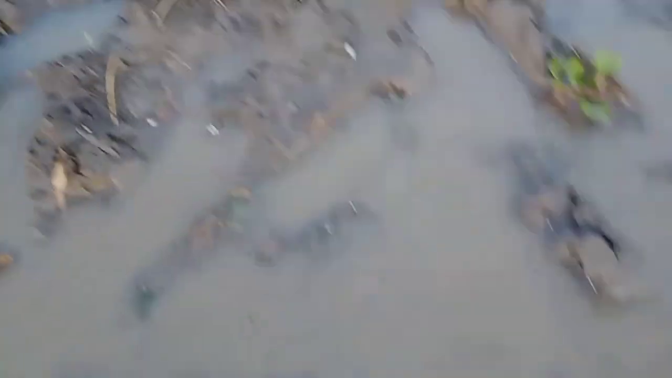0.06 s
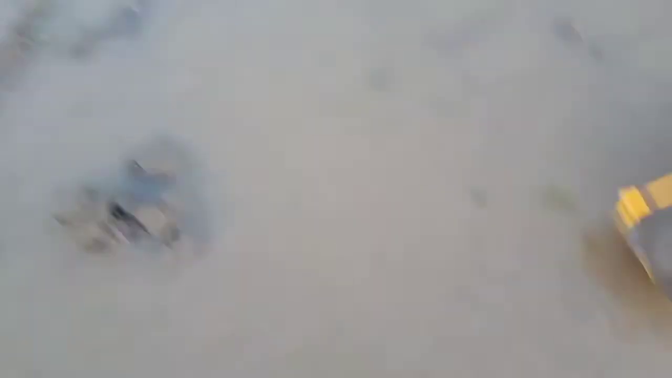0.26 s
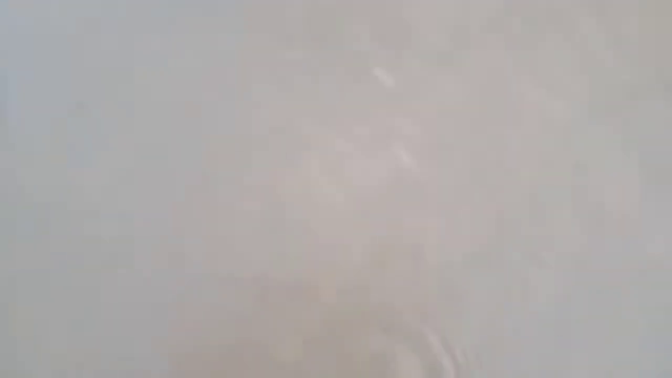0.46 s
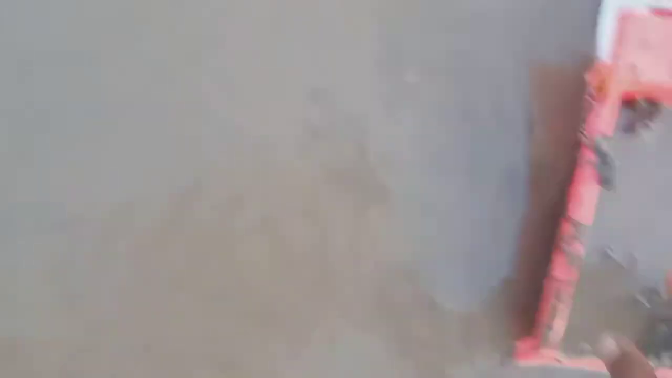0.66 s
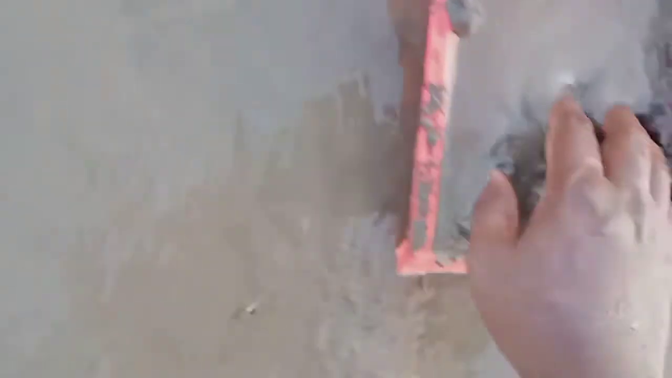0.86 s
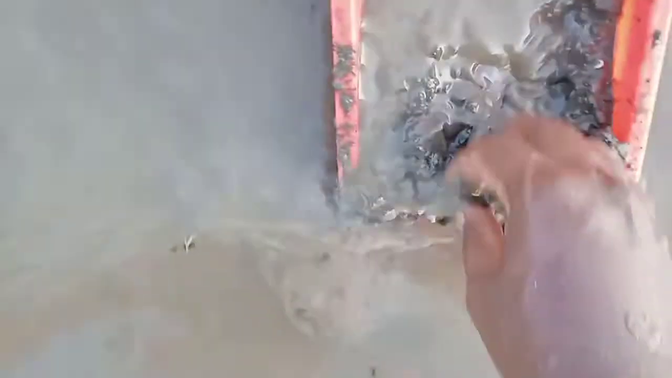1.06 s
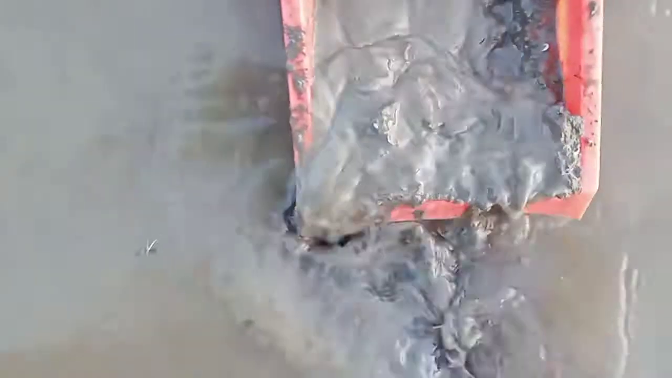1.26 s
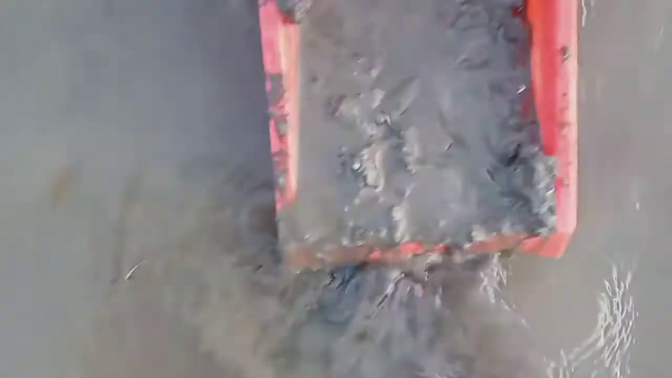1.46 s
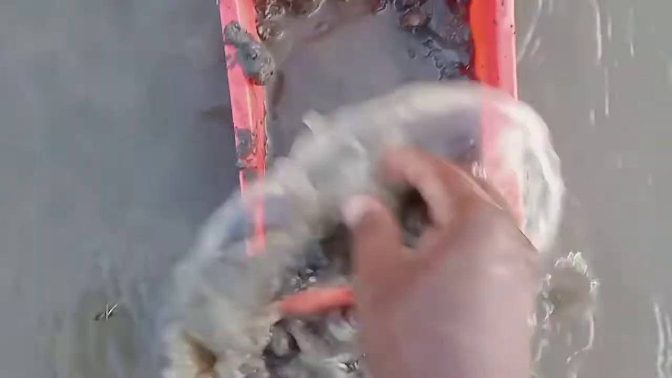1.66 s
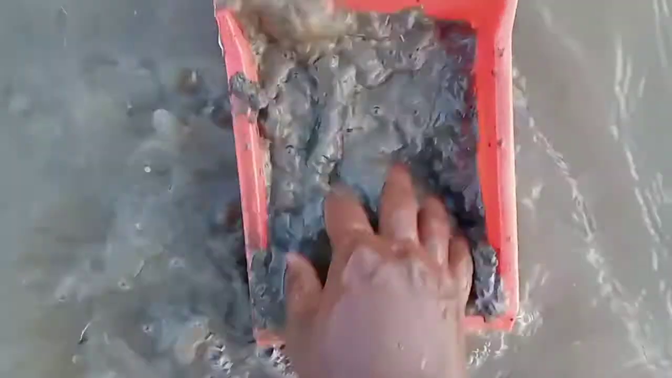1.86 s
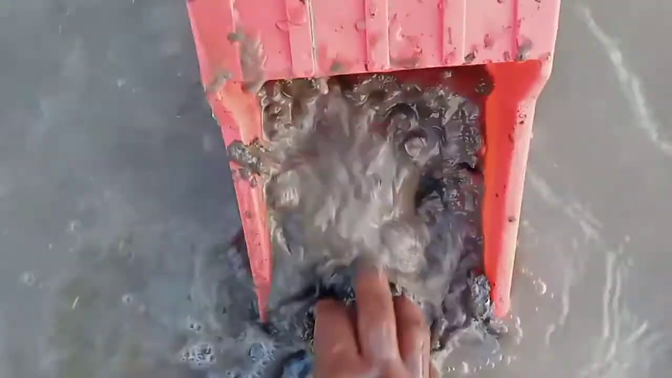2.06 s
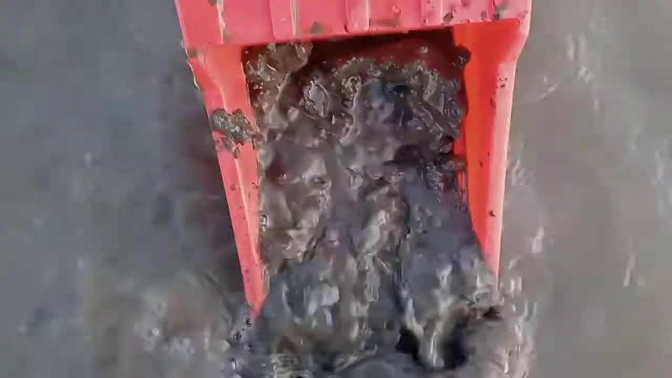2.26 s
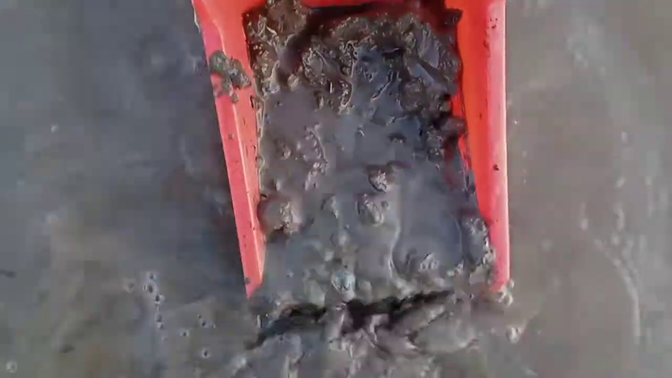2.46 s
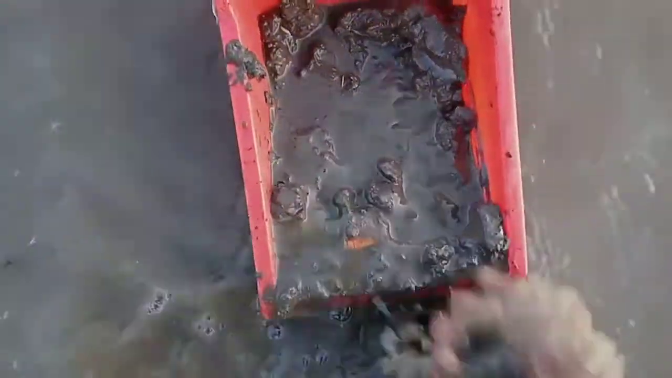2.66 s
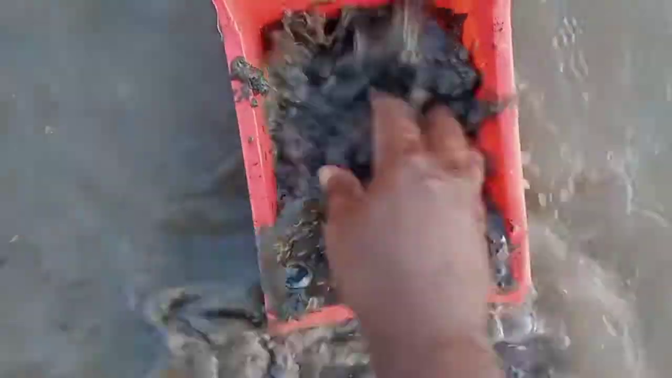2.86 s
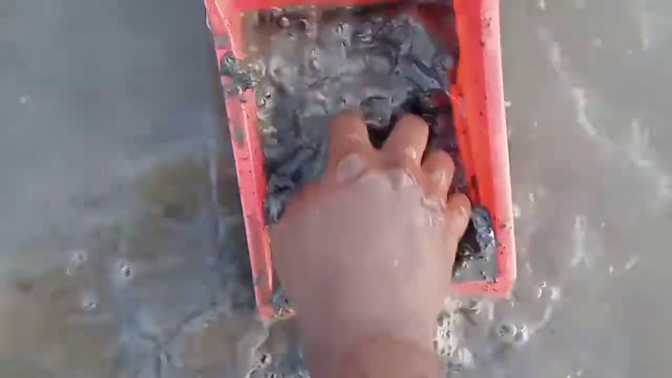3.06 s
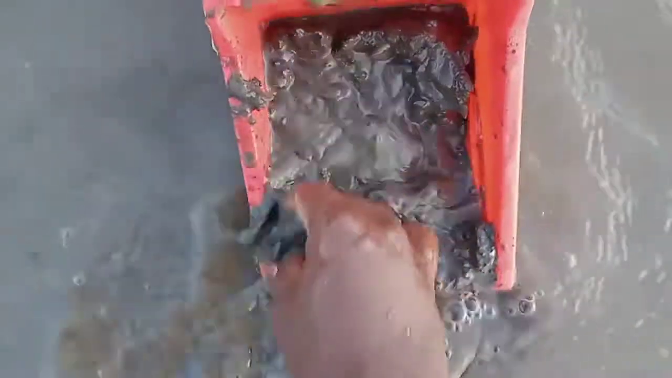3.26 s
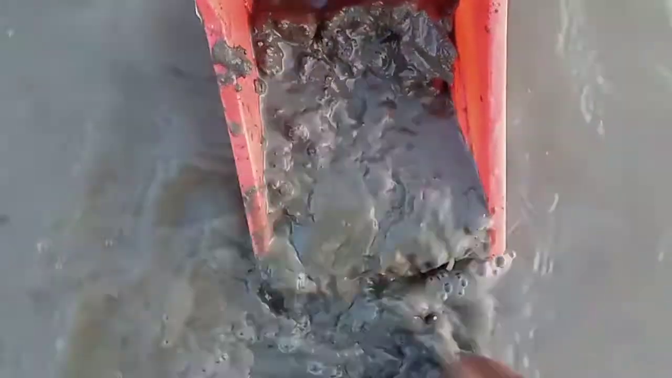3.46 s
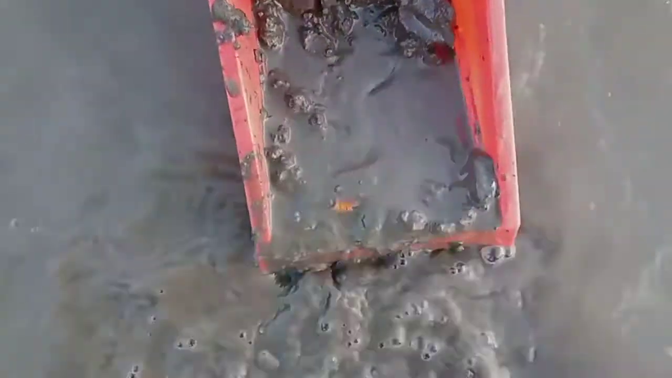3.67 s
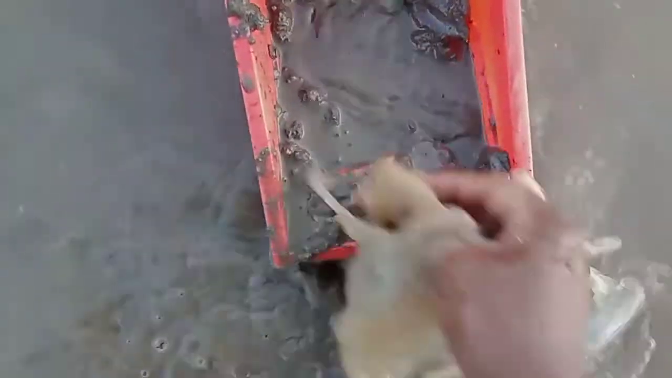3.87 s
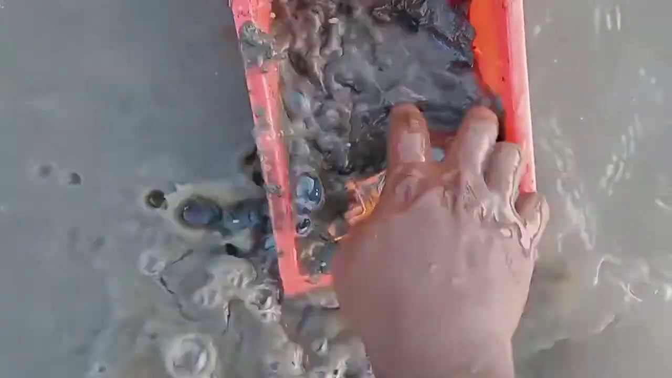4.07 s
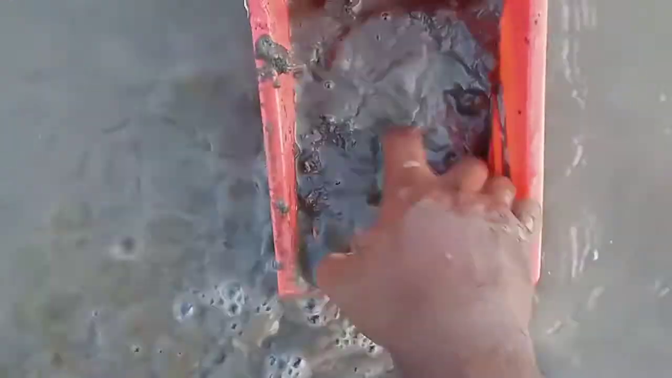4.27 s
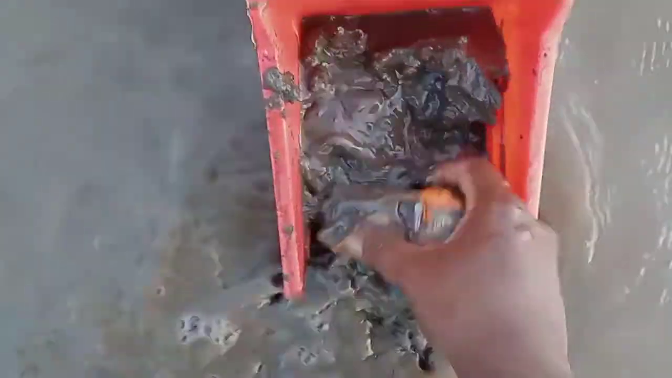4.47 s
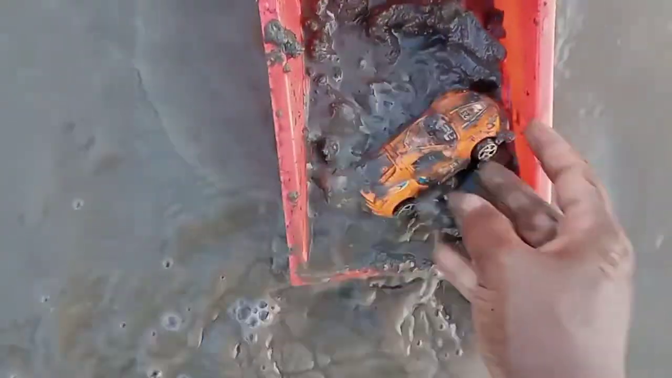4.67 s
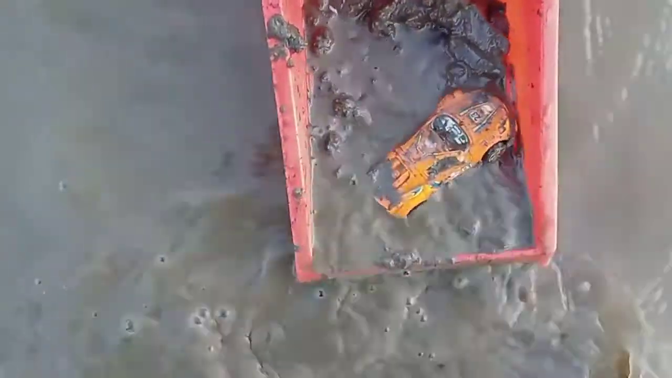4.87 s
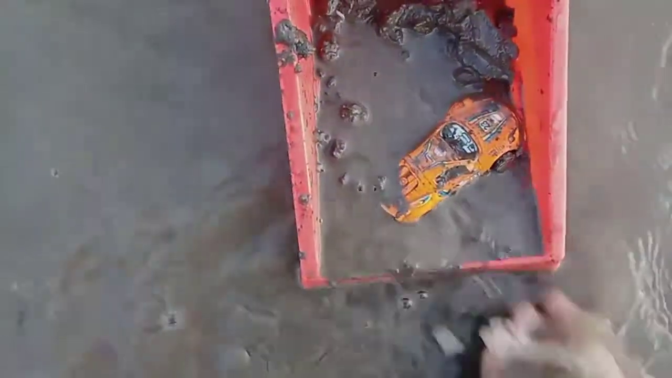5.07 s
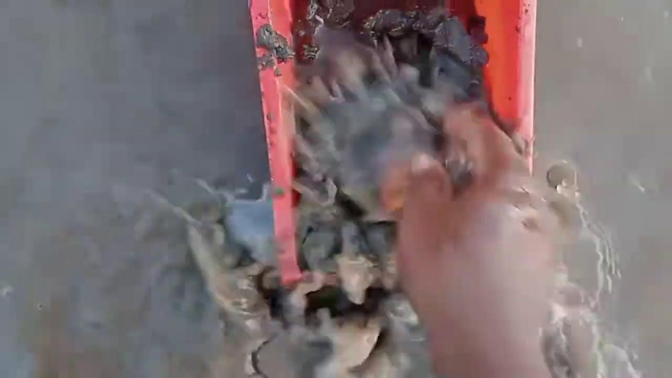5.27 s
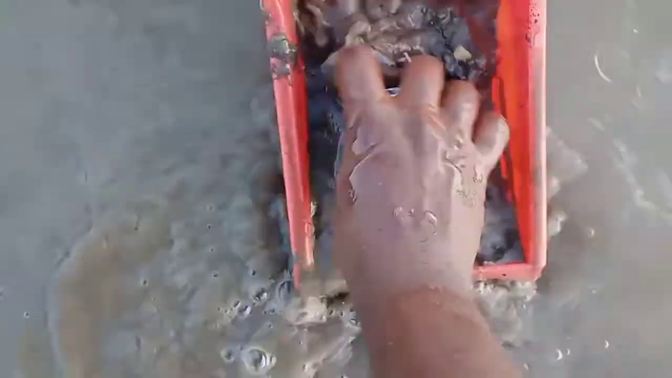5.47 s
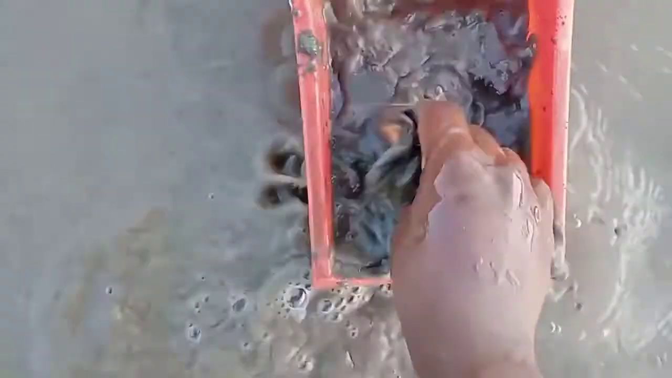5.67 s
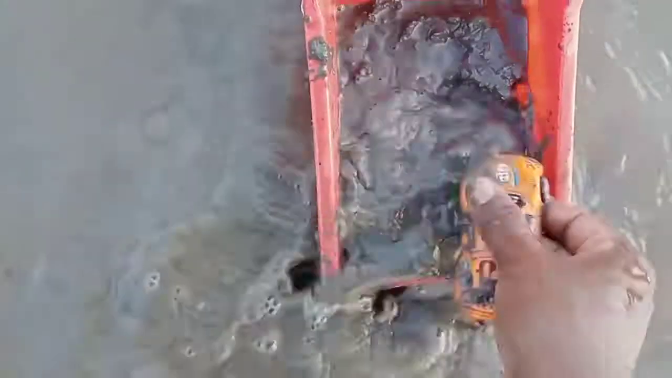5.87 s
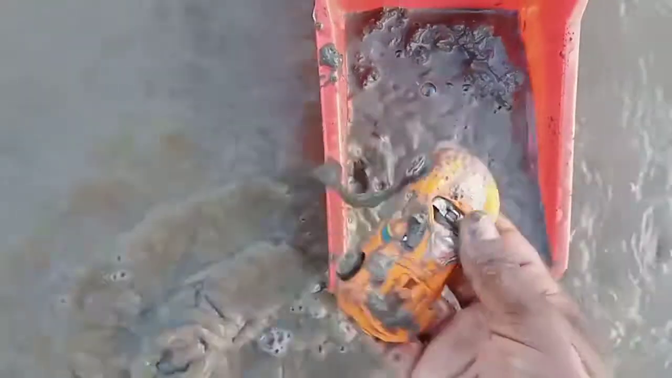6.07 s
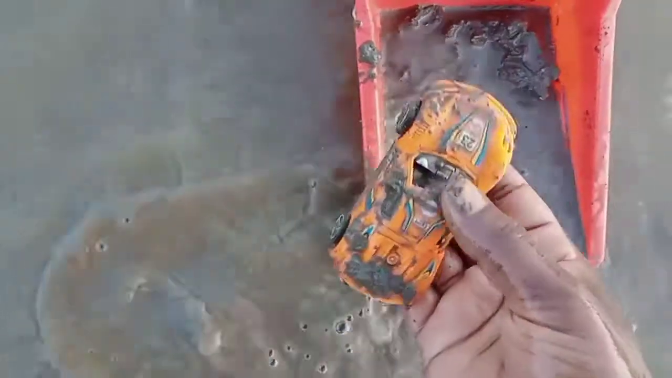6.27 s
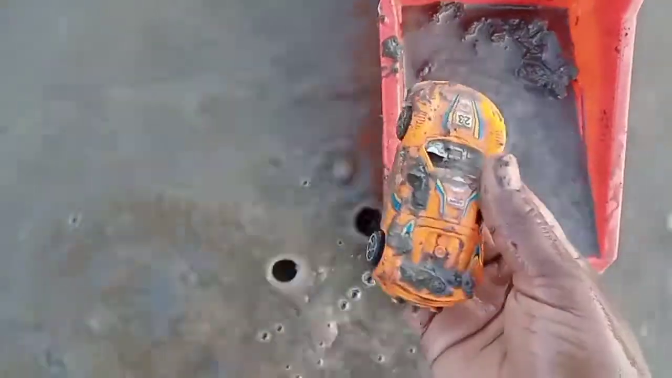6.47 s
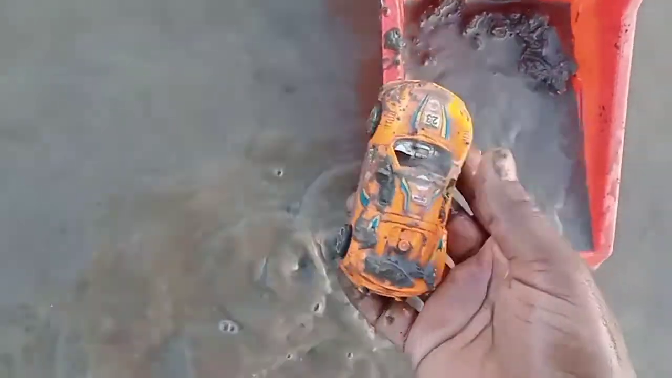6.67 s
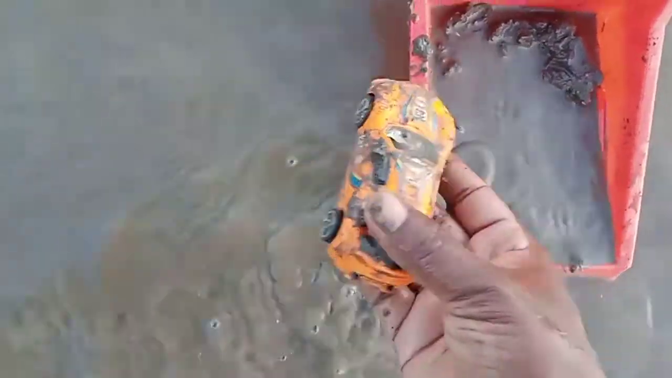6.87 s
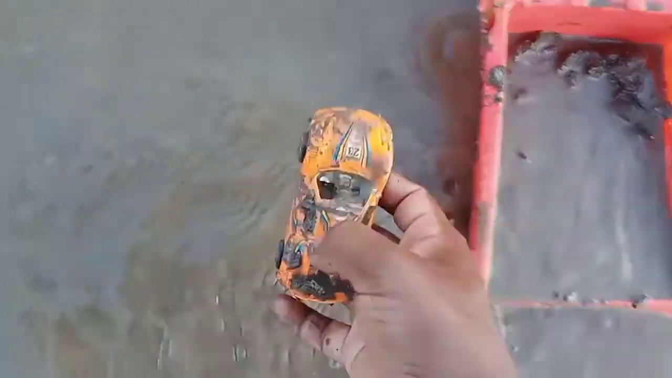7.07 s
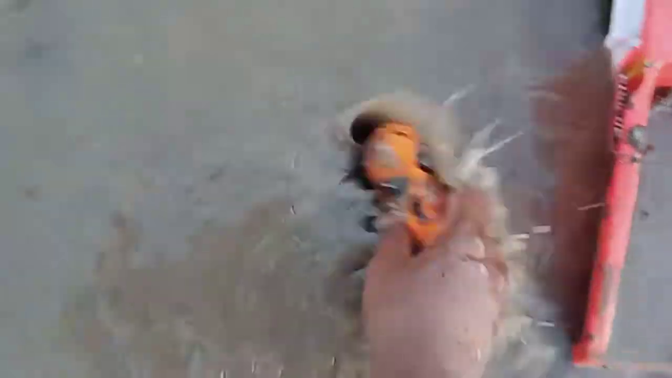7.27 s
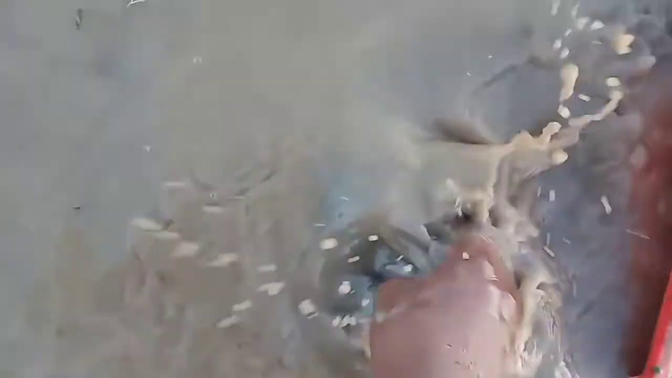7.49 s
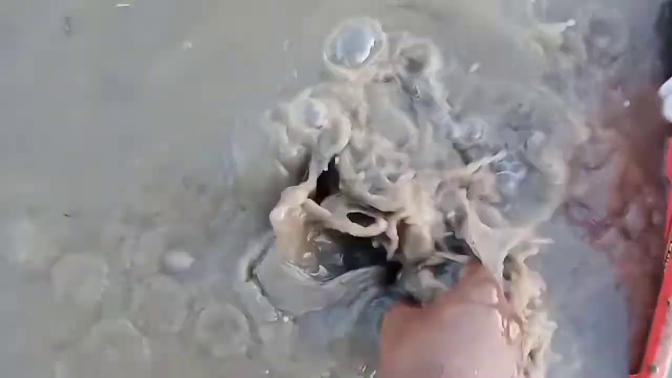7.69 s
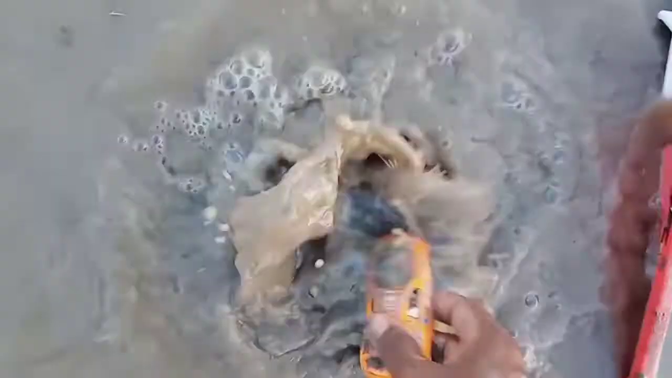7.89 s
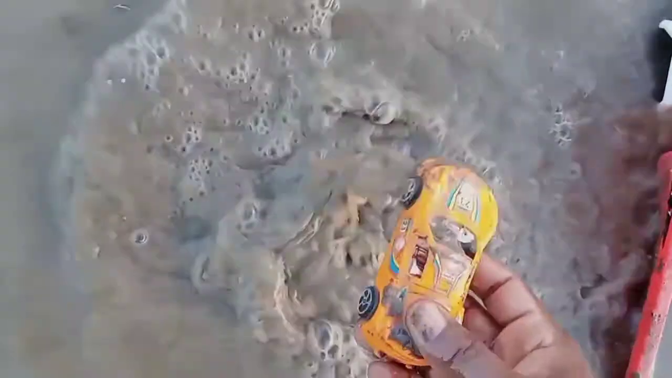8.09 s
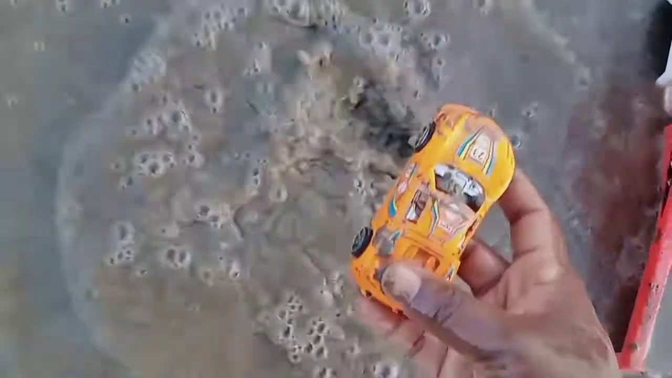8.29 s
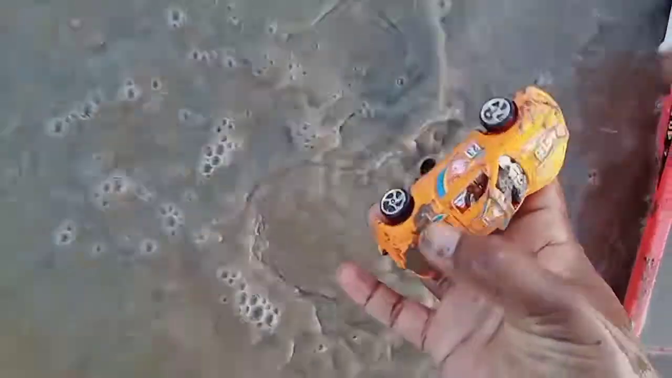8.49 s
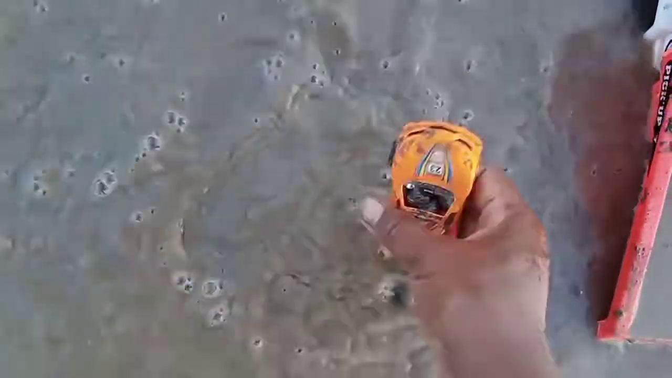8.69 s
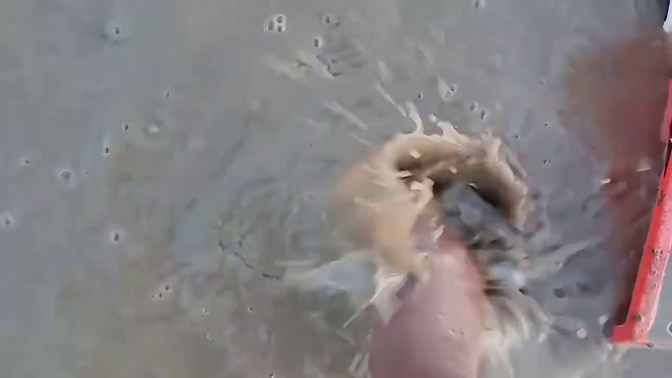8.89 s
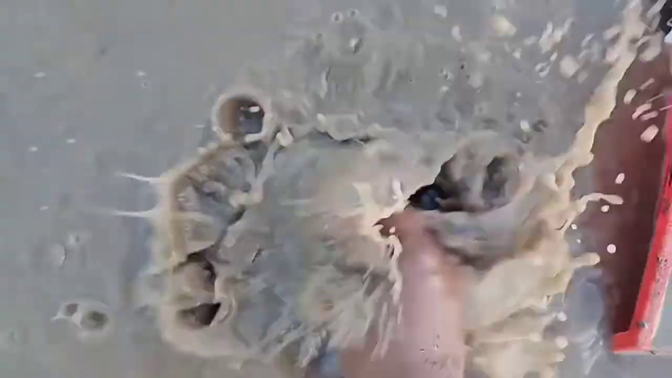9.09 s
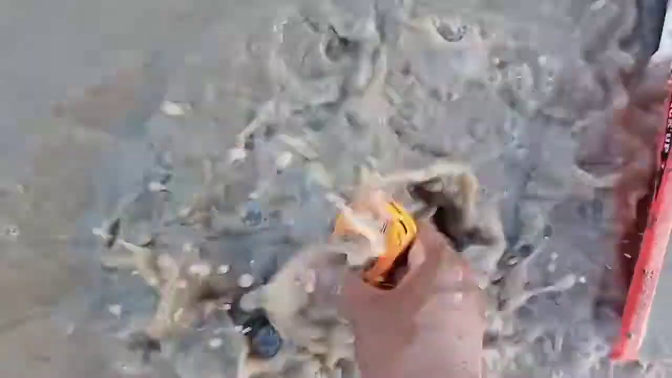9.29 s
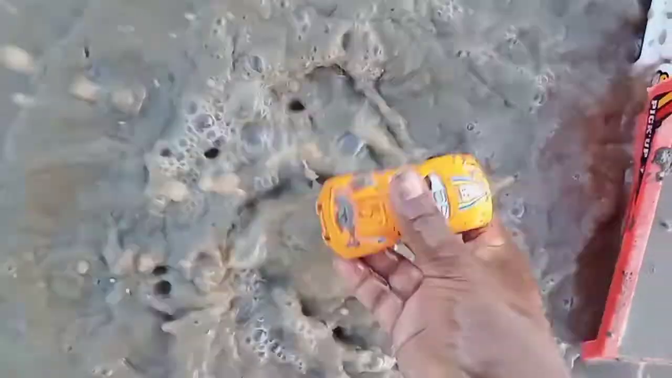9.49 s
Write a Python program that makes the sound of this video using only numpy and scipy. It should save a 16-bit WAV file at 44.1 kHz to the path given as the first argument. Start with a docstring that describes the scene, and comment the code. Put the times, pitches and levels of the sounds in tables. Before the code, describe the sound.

Outdoors, very close to a phone microphone, low wind buffets and a few finger taps come first over little water noise. Then a hand scoops muddy water in a plastic toy bed: short splashes, bubbly plops, wet smacks and spray in uneven strokes. After a near-quiet pause with faint drips and high insects, a toy car is dunked and shaken in two harder, gurgling bursts.

```python
"""A hand scoops muddy water into a plastic toy truck, then dunks and shakes a toy car, in a puddle close to a phone.
Trapped air rings as climbing sines, singly or in clouds; thrown water lands as bursts of bubbles and droplets.
Wet mud smacks as short noise bursts with a ping, and spray crackles as random filtered impacts.
At the microphone, shaped noise makes buffeting air and ringing knocks make finger taps.
Far behind, narrow noise in quick pulses makes high insects, over a faint bed of outdoor air."""
import sys
import numpy as np
from scipy import signal
from scipy.fft import rfft, irfft
from scipy.io import wavfile
from scipy.ndimage import uniform_filter1d

SR = 44100
rng = np.random.default_rng(int(sys.argv[2]) if len(sys.argv) > 2 else 0)


def wrap_up_sound(samples):
    """Save the sound to the file named by the first command line argument, as 16-bit audio."""
    columns = np.atleast_2d(samples).T
    # keep every value between -1 and 1, then stretch to whole-number steps
    tamed = np.clip(columns, -1, 1)
    steps = np.round(tamed * 32767).astype(np.int16)
    wavfile.write(sys.argv[1], SR, steps)


N = 420713  # samples

# Levels in the event tables are relative: the layers and the microphone add their own gains.


def undb(db):
    """Decibels to amplitude gain."""
    return 10 ** (np.asarray(db) / 20)


def unit(x):
    """Scale to rms 1."""
    return x / np.sqrt(np.mean(x ** 2) + 1e-20)


def curve(table):
    """A (t/s, value) table read at every sample."""
    return np.interp(np.arange(N) / SR, *np.transpose(table))


def add(out, start_s, x):
    """Mix x into out from the time start_s."""
    i = int(np.clip(start_s * SR, 0, N - 1))
    out[i:i + len(x)] += x[:N - i]


def walk(rate):
    """Smooth random wander through `rate` knots per second, spread near 1."""
    knots = rng.standard_normal(4096)
    return np.interp(np.arange(N) / SR * rate, np.arange(len(knots)), knots)


def colour(x, points, size=4096):
    """Minimum-phase filter with the given (f/Hz, level/dB) response."""
    hz, db = np.transpose(points)
    bins_hz = np.arange(size // 2 + 1) * SR / size
    log_gain = np.log(undb(np.interp(np.log(bins_hz + 1), np.log(hz), db)))
    # folding the cepstrum forward in time makes the filter causal
    cepstrum = irfft(log_gain)
    cepstrum[1:size // 2] *= 2
    cepstrum[size // 2 + 1:] = 0
    impulse = irfft(np.exp(rfft(cepstrum)))
    return signal.oaconvolve(x, impulse)[:len(x)]


def band(x, hz, width):
    """Two-pole resonance, gain 1 at the centre; hz and width in Hz."""
    w = 2 * np.pi * min(hz, SR / 2 - 1) / SR
    a = np.tan(np.pi * min(abs(width) / SR, .4))
    return signal.lfilter([a, 0, -a], [1 + a, -2 * np.cos(w), 1 - a], x)


def narrow(hz, width):
    """Noise in a band `width` Hz wide whose centre follows the curve hz; rms 1."""
    noise = rng.standard_normal(len(hz)) + 1j * rng.standard_normal(len(hz))
    slow = signal.sosfilt(signal.butter(2, width / 2, fs=SR, output="sos"), noise)
    carrier = np.exp(2j * np.pi * np.cumsum(hz) / SR)
    return unit((slow * carrier).real)


def ring(hz, t60, rise, onset=1.0):
    """A dying sine, as of a bubble: swells over about `onset` cycles and climbs by the share `rise`."""
    t = np.arange(int(abs(t60) * SR) + 2) / SR
    life = t / t[-1]
    tone = np.sin(2 * np.pi * hz * t * (1 + rise * life / 2))
    decay = np.exp(-np.log(1000) * life)  # 60 dB over the ring's life
    return tone * decay * (1 - np.exp(-t * hz / onset))


def droplets(rate, spread_db):
    """Random impacts, `rate` per second, their strengths spread exponentially in dB; rms 1."""
    hit = rng.random(N) < rate / SR
    size = undb(spread_db * np.minimum(rng.standard_exponential(N), 3.5))
    return unit(hit * size * rng.choice([-1, 1], N))


def froth(low_hz, high_hz, cycles, rise, spread_db, count):
    """A steady cloud of bubbles of mixed sizes, favouring the faint; rms 1."""
    out = np.zeros(N)
    for k, (when, pitch, size, damping, climb) in enumerate(rng.random((count, 5))):
        hz = low_hz * (high_hz / low_hz) ** pitch
        t60 = cycles * (.5 + damping) / hz
        # small bubbles die sooner but start as much stronger
        peak = undb(spread_db * size ** 2) * np.sqrt(hz)
        start_s = (k + 3 * when) / count * N / SR
        add(out, start_s, peak * ring(hz, t60, 2 * rise * climb, onset=.9))
    return unit(out)


def surges(rows, rise_s, fall_db_per_s):
    """Joint gain of (t/s, length/s, level/dB) events that each swell, hold and die away."""
    t = np.arange(0, N, 64) / SR
    power = np.zeros(len(t))
    for s, length, db in rows:
        swell = np.clip((t - s) / rise_s, 0, 1)
        fall_db = fall_db_per_s * np.maximum(t - s - length, 0)
        power += (undb(db - fall_db) * swell) ** 2
    return np.interp(np.arange(N) / SR, t, np.sqrt(power))


# spectrum of the open air around the puddle: f/Hz, level/dB
OUTDOOR_SPECTRUM = [(30, 4), (80, 10.5), (200, -4.5), (500, -6.5), (1000, -29), (1240, -15), (1500, -20.5),
                    (3000, -17.5), (5000, -16.5), (9000, -25), (16000, -21)]


def outdoor_air():
    """A faint, steady bed of shaped noise."""
    return undb(-70.0) * unit(colour(rng.standard_normal(N), OUTDOOR_SPECTRUM))


# calls of a nearer, lower insect: t/s, length/s, level/dB
NEARER_CHIRPS = [(6.188, 0.046, -60), (6.524, 0.072, -69), (6.9, .07, -71.5)]


def insects():
    """A far, high chirr in quick, slightly uneven wing strokes; a lower voice joins briefly."""
    strokes_per_s = 42 * (1 + 0.16 * walk(16))
    phase = np.cumsum(strokes_per_s) / SR % 1
    # each stroke swells and dies while its pitch falls
    stroke, fall = np.sin(np.pi * phase), .5 - phase
    pulsed = undb(-64) * stroke * narrow(7750 + 600 * fall, 450)
    steady = undb(-71.0) * narrow(np.full(N, 7700), 1120)
    out = (pulsed + steady) * undb(0.47 * walk(2.4))
    lower = stroke * narrow(5950 + 300 * fall, 200)
    for s, length, db in NEARER_CHIRPS:
        i, n = int(s * SR), int(length * SR)
        add(out, s, undb(db + 6.5) * np.hanning(n) * lower[i:i + n])
    return out


# gusts over the microphone: t/s, length/s, level/dB
WIND_GUSTS = [(0.02, 0.14, -32.5), (0.23, 0.067, -33), (0.42, 0.074, -32.5), (0.74, 0.031, -44.5),
              (0.85, 0.023, -52), (0.99, 0.045, -42), (1.07, .14, -27), (1.25, .09, -32.5),
              (1.35, 0.22, -27.5), (1.67, 0.14, -38.5), (1.93, .16, -36), (2.1, 0.081, -31.5),
              (2.33, 0.2, -32), (2.53, 0.11, -42.5), (2.76, .12, -59), (2.96, .05, -41.5),
              (3.14, 0.15, -53.5), (3.4, 0.23, -53), (3.75, 0.14, -54), (3.92, .15, -45),
              (4.15, 0.063, -51.5), (4.31, .18, -44), (4.88, 0.3, -57), (5.32, .15, -56.5),
              (5.6, 0.083, -58.5), (5.79, 0.037, -51), (5.98, 0.063, -52), (6.32, 0.11, -66),
              (7.02, 0.1, -68), (7.27, .1, -52), (7.5, 0.48, -42), (8.01, .17, -36.5), (8.23, .09, -42),
              (8.35, 0.025, -42.5), (8.47, .04, -50), (8.61, 0.025, -46.5), (9.39, 0.025, -43.5)]
GUST_RISE_S, GUST_FALL_DB_PER_S = 0.014, 251
# light air under and between the gusts: t/s, level/dB
LIGHT_AIR = [(0, -40), (0.65, -62), (1.8, -46), (2.75, -57), (4.7, -64.5), (5.9, -78), (6.2, -84.5),
             (6.9, -86.5), (7.5, -60), (8.75, -83), (9.2, -60), (9.54, -66)]
# spectrum of air turbulence at the microphone: f/Hz, level/dB
WIND_SPECTRUM = [(25, -30), (45, -9), (75, 6.5), (110, 8), (160, 0.5), (240, -9.5), (340, -37), (600, -49),
                 (1500, -73.5)]
# short puffs on the microphone: t/s, level/dB, f/Hz
MIC_PUFFS = [(0.075, -6.5, 109), (0.253, -9, 129.5), (0.439, -23, 115), (1.093, -30, 109),
             (1.176, -13, 143), (1.514, -10.5, 168), (1.551, -13, 91.5), (2.382, -20, 117),
             (2.994, -24, 103), (8.165, -11, 98), (8.295, -37, 99.6), (8.376, -9.5, 103), (8.506, -15, 138)]


def wind():
    """Eddies buffet the microphone port in uneven shoves, now and then in a single soft thump."""
    gusts = surges(WIND_GUSTS, GUST_RISE_S, GUST_FALL_DB_PER_S)
    breeze = np.hypot(gusts, undb(curve(LIGHT_AIR)))
    breeze_db = 20 * np.log10(breeze) + 2.6 * walk(32)
    eddies = unit(colour(rng.standard_normal(N), WIND_SPECTRUM))
    # evened out, so that the breeze sets how hard they push
    eddies /= np.sqrt(uniform_filter1d(eddies ** 2, size=1000) + 0.017)
    # stronger air sheds smaller, quicker eddies as well
    flutter = undb(1.6 * breeze_db + 2) * narrow(np.full(N, 260), 110)
    out = undb(breeze_db) * eddies + flutter
    for s, db, hz in MIC_PUFFS:
        add(out, s, undb(db + 4) * ring(hz, 0.037, 0.029, onset=0.94))
    return signal.sosfilt(signal.butter(2, 45, "high", fs=SR, output="sos"), out)


# fingers bumping the phone case: t/s, level/dB
CASE_TAPS = [(0.029, -50), (0.107, -30.5), (.197, -42.5), (6.218, -49)]


def taps():
    """A dull knock that rings the case near the pitch of its port, with a click above and a thud below."""
    out = np.zeros(N)
    for s, db in CASE_TAPS:
        add(out, s, undb(db) * ring(1223, 0.016, 0, onset=0.29))
        add(out, s, undb(db + 8.0) * ring(3030, 0.0024, 0, onset=0.37))
        add(out, s, undb(db - 11) * ring(480, 0.0096, 0, onset=0.66))
    return out


def drips():
    """The puddle never quite rests: faint pings and ticks of drips off hand and toy, and bursting foam."""
    pings = froth(1700, 3600, cycles=45, rise=0.28, spread_db=14.5, count=330)
    ticks = froth(2000, 12000, cycles=5, rise=.1, spread_db=19.5, count=300)
    return undb(-78) * (pings + undb(-6) * ticks)


# hollows opening or closing behind the hand: t/s, length/s, start f/Hz, end f/Hz, level/dB
HOLLOWS = [(3.781, 0.055, 1313, 600, -45), (4.879, 0.069, 1300, 737, -43.5), (5.171, 0.068, 1177, 609, -44),
           (7.359, 0.067, 1200, 526, -40), (7.412, 0.084, 564, 429, -41.5), (7.576, 0.16, 424, 788, -39.5),
           (7.767, 0.086, 680, 354, -36), (7.881, 0.055, 341, 131, -37), (9.32, 0.089, 896, 600, -41.5)]


def gulps():
    """Water rushes round a hollow whose pitch falls as it grows and rises as it fills."""
    out = np.zeros(N)
    for s, length, start_hz, end_hz, db in HOLLOWS:
        life = np.linspace(0, 1, int(length * SR))
        swell = np.sqrt(4 * life * (1 - life))
        glide_hz = start_hz * (end_hz / start_hz) ** life
        add(out, s, undb(db) * swell * narrow(glide_hz, 180))
    return out


# the sharpest drops and snapping mud films, and in the first row the bright click of the finger knock on the
# case: t/s, level/dB, centre f/Hz
WET_SMACKS = [(0.106, -33.5, 6060), (0.3877, -46, 5800), (0.4016, -51.5, 3100), (0.5744, -49, 3350),
              (1.207, -34.5, 4960), (1.247, -33, 4570), (1.257, -36, 7440), (1.3615, -32.5, 4540),
              (1.3933, -31, 7450), (1.4413, -30, 3680), (1.5067, -35.5, 4480), (1.7134, -26, 3440),
              (1.826, -28.5, 5500), (1.9857, -20, 3090), (2.1235, -35, 5200), (2.195, -28, 4190),
              (2.2484, -33, 3040), (2.303, -34, 6200), (2.3538, -37.5, 3640), (2.487, -35, 7000),
              (2.506, -33, 7050), (2.637, -30.5, 5660), (2.846, -25.5, 5200), (2.8723, -25.5, 6500),
              (2.913, -28.5, 5500), (3.2233, -39, 5100), (3.419, -28, 3310), (3.5869, -39, 7560),
              (3.6568, -34.5, 4140), (3.7053, -34, 6040), (3.929, -31, 5270), (3.9926, -30, 7540),
              (4.352, -33, 3080), (4.5335, -38, 8700), (4.868, -41, 5030), (4.879, -35, 7050),
              (4.9623, -31.5, 7000), (5.002, -24, 4450), (5.0604, -31.5, 4630), (5.2815, -23, 4970),
              (5.3137, -21.5, 5840), (5.5885, -35.5, 6700), (5.863, -36.5, 8000), (5.9437, -38.5, 4970),
              (5.9773, -34.5, 6900), (6.7063, -38.5, 3470), (6.7362, -48, 4500), (6.9454, -40.5, 3540),
              (7.27, -32.5, 5540), (7.3523, -32, 3600), (7.3772, -29.5, 4360), (7.4643, -19, 6200),
              (7.5001, -20.5, 5950), (7.5041, -22.5, 4930), (7.605, -30, 6900), (7.744, -28.5, 3320),
              (7.8655, -23.5, 5040), (8.055, -37.5, 7770), (8.0977, -41.5, 4300), (8.3876, -41, 5670),
              (8.448, -31, 3060), (8.5153, -34.5, 3860), (8.793, -29, 3920), (8.8565, -22, 4580),
              (8.9728, -30, 7800), (9.006, -31.5, 3400), (9.2028, -23.5, 6430), (9.3567, -28, 2980),
              (9.4609, -32, 6000)]


def smacks(size=700):
    """A quick wet contact, a brief splatter and the ping of the tiny bubble left behind."""
    out, t = np.zeros(N), np.arange(size) / SR
    envelope = (1 - np.exp(-t / 0.00044)) * (np.exp(-t / 0.00091) + 0.3 * np.exp(-t / 0.0036))
    for s, db, hz in WET_SMACKS:
        burst = rng.standard_normal(size) * envelope
        splatter = unit(band(band(burst, hz, 0.5 * hz), hz, 1.6 * hz))
        ping = unit(np.sin(2 * np.pi * hz * t * (1 + 6 * t)) * t * np.exp(-t * hz / 3.7))
        add(out, s, undb(db - 7.5) * (splatter + .6 * ping))
    return out


# spectrum of fine spray, in the slaps and the stirred water alike: f/Hz, level/dB
SPRAY_SPECTRUM = [(900, -30), (1600, -6.5), (2400, -7), (3600, 1.5), (5500, 0.5), (7500, -1.5),
                  (10000, -9.5), (13000, -6.5), (16000, -17)]
# thrown water landing: t/s, length/s, body level/dB, spray level/dB
WATER_SLAPS = [(1.295, 0.01, -38.5, -39.5), (1.571, 0.014, -34, -50), (1.697, 0.015, -29, -40),
               (1.746, 0.021, -32.5, -35), (2.189, 0.011, -38, -34.5), (2.797, 0.023, -37, -35.5),
               (2.826, 0.078, -47.5, -40), (3.127, 0.014, -41.5, -45.5), (3.395, 0.0048, -38, -44),
               (3.95, 0.027, -39, -37), (4.006, 0.005, -37, -41), (4.893, 0.022, -61, -40.5),
               (4.993, 0.019, -29, -35), (5.135, 0.014, -36, -39.5), (5.268, 0.027, -35.5, -35),
               (5.304, 0.018, -36, -32), (7.483, 0.011, -36, -35), (7.624, 0.046, -34, -62),
               (7.709, 0.0093, -31.5, -38.5), (7.86, 0.017, -41, -37), (8.905, 0.025, -47, -35.5),
               (9.003, 0.019, -35, -32), (9.085, 0.037, -40, -36), (9.175, 0.056, -33.5, -35.5),
               (9.261, 0.05, -43, -38.5)]


def slaps():
    """A sheet of water lands: a rush of thick, damped bubbles and a shower of droplets."""
    body = froth(600, 2600, cycles=15, rise=.25, spread_db=3, count=9000)
    uneven = undb(4.3 * walk(400))
    shower = unit(colour(droplets(rate=5800, spread_db=-4), SPRAY_SPECTRUM) * uneven)
    out = np.zeros(N)
    for s, length, body_db, spray_db in WATER_SLAPS:
        t = np.arange(int(2 * length * SR)) / SR
        swell = (1 - np.exp(-t / 0.00056)) * np.exp(-(t / length) ** 4 / 2)
        i = int(s * SR)
        landing = undb(body_db) * body[i:i + len(t)] + undb(spray_db) * shower[i:i + len(t)]
        add(out, s, swell * landing)
    return out


# the largest air pockets closing: t/s, level/dB, f/Hz, ring t60/s
AIR_POCKETS = [(0.325, -41.5, 860, 0.12), (0.404, -41, 1830, 0.024), (0.542, -55.5, 1230, 0.056),
               (0.692, -55, 766, .07), (0.768, -43.5, 2460, 0.023), (1.434, -22.5, 590, 0.03),
               (1.535, -11.5, 734, 0.014), (1.576, -22, 1214, 0.023), (1.7, -25, 1460, 0.022),
               (1.924, -27.5, 1054, 0.0075), (1.958, -26.5, 940, 0.011), (2.416, -30, 1520, 0.02),
               (2.627, -30.5, 1092, 0.039), (2.76, -28.5, 850, 0.025), (2.808, -13.5, 1450, 0.0091),
               (2.904, -27.5, 1098, 0.035), (3.08, -33.5, 836, .038), (3.4, -22.5, 882, 0.043),
               (3.43, -30, 1100, .029), (3.508, -35, 990, 0.034), (3.543, -35, 272, 0.04),
               (3.622, -41.5, 717, 0.12), (3.684, -31, 583, 0.084), (3.698, -24, 1720, 0.028),
               (3.791, -23.5, 1010, 0.043), (3.813, -26.5, 875, 0.033), (3.862, -29.5, 543, .051),
               (3.93, -18.5, 413, 0.03), (3.958, -18, 800, 0.011), (3.967, -24.5, 1825, 0.031),
               (4.043, -26, 1300, 0.009), (4.35, -13.5, 1300, 0.0035), (4.699, -34, 740, 0.032),
               (4.904, -27, 1070, 0.036), (4.948, -25, 1420, .023), (4.997, -24, 1108, .039),
               (5.105, -27.5, 1210, 0.019), (5.201, -29, 2200, .026), (5.265, -27, 668, 0.091),
               (5.282, -21.5, 945, .03), (5.638, -30, 1120, .018), (5.717, -29, 1264, 0.02),
               (5.806, -26, 1120, .016), (5.869, -31.5, 1157, 0.021), (6.413, -33.5, 1256, 0.017),
               (7.276, -37.5, 1185, 0.11), (7.311, -36.5, 487, 0.14), (7.345, -14.5, 1146, 0.02),
               (7.427, -21.5, 920, 0.025), (7.513, -28, 250, 0.054), (7.544, -28.5, 287, 0.16),
               (7.569, -29, 1895, 0.046), (7.605, -23, 1154, 0.027), (7.641, -24, 1640, 0.028),
               (7.709, -21.5, 1230, 0.014), (7.777, -13.5, 582, 0.025), (7.801, -19.5, 515, 0.044),
               (7.874, -26.5, 450, 0.14), (8.532, -43, 890, 0.058), (8.65, -50, 2900, .02),
               (8.838, -25.5, 1515, .012), (8.903, -30, 2100, 0.039), (8.975, -29, 1180, .017),
               (9.01, -29, 529, .1), (9.048, -23, 1120, .028), (9.081, -25, 790, 0.033),
               (9.127, -20, 794, 0.026), (9.187, -14.5, 1330, 0.018), (9.232, -20.5, 636, 0.028),
               (9.319, -14, 880, 0.011)]
# pitch climbs steadily as a bubble rises, by this share of its start each second
CLIMB_PER_S = 8.5


def bubbles():
    """The larger air pockets plop out singly, each a dying sine that climbs."""
    out = np.zeros(N)
    for s, db, hz, t60 in AIR_POCKETS:
        add(out, s, undb(db + 1.5) * ring(hz, t60, CLIMB_PER_S * t60, onset=0.75))
    return out


# pushes of the hand or toy through the water:
# t/s, length/s, small-bubble level/dB, large-bubble level/dB, spray level/dB
WATER_STROKES = [(0.01, 0.023, -58.5, -52.5, -69), (0.366, 0.085, -63, -57.5, -73),
                 (0.51, 0.093, -69, -83, -88), (0.663, 0.046, -68, -74, -79), (0.746, .07, -65, -83, -72.5),
                 (0.906, 0.13, -58, -64, -71), (1.085, 0.057, -52.5, -65, -53),
                 (1.214, 0.075, -53, -61, -59), (1.329, 0.11, -42.5, -42.5, -48.5),
                 (1.49, 0.13, -42.5, -44, -50.5), (1.666, 0.078, -34, -63, -42.5),
                 (1.769, 0.039, -45.5, -56, -43), (1.939, 0.13, -57.5, -59, -59.5),
                 (2.159, 0.097, -41.5, -56, -45.5), (2.269, 0.051, -45, -58, -49),
                 (2.343, 0.087, -57, -63, -56.5), (2.473, 0.086, -44, -50, -48.5),
                 (2.597, 0.11, -41.5, -63, -50), (2.764, 0.11, -38, -57, -42.5),
                 (3.047, 0.12, -51, -67.5, -57.5), (3.202, 0.11, -56, -57, -62),
                 (3.348, 0.099, -44.5, -81, -50.5), (3.474, 0.057, -51, -78, -56.5),
                 (3.649, 0.23, -44.5, -60.5, -52), (3.892, 0.12, -46, -49.5, -45),
                 (4.078, .04, -57.5, -56, -52.5), (4.222, 0.089, -47.5, -52, -56.5),
                 (4.383, 0.059, -51, -79, -57.5), (4.502, 0.1, -52.5, -65, -57),
                 (4.604, 0.13, -59, -68, -57.5), (4.872, 0.14, -44.5, -59, -47),
                 (5.055, 0.15, -43, -53.5, -50.5), (5.249, 0.087, -38, -55, -38.5),
                 (5.38, 0.11, -51.5, -66, -58.5), (5.571, 0.13, -46, -59.5, -51),
                 (5.723, .15, -53, -68, -57.5), (5.893, 0.075, -83, -76, -53),
                 (6.008, 0.072, -62.5, -79, -60.5), (6.13, .03, -67, -88, -76),
                 (6.33, 0.034, -71, -90, -78), (6.402, 0.041, -59.5, -75.5, -67.5),
                 (6.979, 0.046, -66, -81.5, -73.5), (7.106, 0.045, -64.5, -78, -72),
                 (7.244, 0.057, -47.5, -69, -45), (7.319, 0.12, -38.5, -62, -45.5),
                 (7.468, 0.064, -38, -40, -45), (7.574, 0.26, -36.5, -36.5, -41.5),
                 (7.824, 0.085, -39.5, -42, -44), (7.94, 0.076, -39.5, -50, -43),
                 (8.147, 0.11, -75, -90, -56.5), (8.283, 0.051, -76, -88, -57),
                 (8.468, 0.086, -67, -84, -60), (8.588, 0.089, -74, -90, -67),
                 (8.735, 0.082, -54.5, -84, -51.5), (8.845, 0.22, -40.5, -69, -44.5),
                 (8.935, 0.063, -33.5, -49, -44), (8.999, 0.21, -34.5, -42, -43),
                 (9.224, 0.14, -37, -48.5, -43), (9.36, 0.16, -48.5, -58, -51)]
# a stroke swells, dies quickly once the hand stops, and leaves the water rocking faintly
SWELL_S, CALM_DB_PER_S = 0.022, 241.5
ROCKING_DB, ROCKING_DB_PER_S = -14, 62


def stirring(column):
    """Level in dB that the strokes give to one part of the water's sound, with the rocking that follows."""
    rows = [(row[0], row[1], row[column]) for row in WATER_STROKES]
    push = surges(rows, SWELL_S, CALM_DB_PER_S)
    rocking = undb(ROCKING_DB) * surges(rows, SWELL_S, ROCKING_DB_PER_S)
    return 20 * np.log10(np.hypot(push, rocking) + 1e-6)


def sloshing():
    """Gentle motion only swishes, more breaks off bubbles and lone drops, hard churning a dense shower."""
    small_db, large_db, spray_db = stirring(column=2), stirring(column=3), stirring(column=4)
    # shares from 0 to 1 that grow with the stirring
    breaking = 1 / (1 + np.exp(-(np.maximum(spray_db, small_db - 4) + 67) / 9.8))
    churning = 1 / (1 + np.exp(-(spray_db + 44) / 3))

    wash = unit(band(band(droplets(rate=5000, spread_db=4.5), 1400, 1800), 1400, 2100))
    gurgle = froth(406, 850, cycles=20, rise=0.54, spread_db=19, count=1100)
    babble = froth(723, 2223, cycles=24.8, rise=0.44, spread_db=19.5, count=3200) + 0.2 * wash
    fizz = froth(2400, 8500, cycles=85, rise=0.25, spread_db=33.0, count=5500)
    # each lone drop ticks briefly at its own pitch
    lone_drops = froth(2040, 10370, cycles=8.7, rise=0.058, spread_db=41.0, count=6500)
    shower = unit(colour(droplets(rate=3400, spread_db=3.0), SPRAY_SPECTRUM))
    mist = unit(colour(droplets(rate=4000, spread_db=-2), SPRAY_SPECTRUM))

    spurts = undb(3.2 * walk(170) - 1)
    drops = 1.41 * np.sqrt(1 - churning) * lone_drops + np.sqrt(churning) * shower
    spatter = spurts * (1.06 * fizz + drops)
    swish = undb(small_db - 8.5) * wash + undb(spray_db) * mist
    broken = undb(small_db - 2.5) * babble + undb(spray_db) * spatter
    return undb(large_db) * gurgle + np.sqrt(breaking) * broken + np.sqrt(1 - breaking) * swish


def scene():
    """The water is close; the toy and the bank scatter a faint short tail of it."""
    water = drips() + gulps() + smacks() + slaps() + bubbles() + sloshing()
    t = np.arange(SR // 4) / SR
    # noise that starts after 3 ms and dies quickly
    scatter = band(rng.standard_normal(len(t)), 2070, 5250) * np.exp(-t / 0.006) * (t > .003)
    tail = signal.oaconvolve(water, scatter / np.linalg.norm(scatter))[:N]
    return (outdoor_air() + insects() + wind() + taps() + water + undb(-19.5) * tail)[None]


# resonances of the microphone port and phone case: f/Hz, width/Hz, level/dB
PORT_RESONANCES = [(1241, 150, 12), (1890, 470, 3), (2570, 1700, 2.5), (6310, 860, 5.5), (6590, 165, -24.5),
                   (7430, 1440, 7.5), (12740, 3800, -6.5), (15000, 400, 22.5)]
TOP_HZ = 15450


def record(dry):
    """The phone's port adds its peaks and dips; the top is cut."""
    for hz, width, db in PORT_RESONANCES:
        a = np.tan(np.pi * width / SR)
        g = undb(db / 2)
        c = -2 * np.cos(2 * np.pi * hz / SR)
        dry = signal.lfilter([1 + a * g, c, 1 - a * g], [1 + a / g, c, 1 - a / g], dry)
    top_cut = signal.ellip(10, .2, 70, TOP_HZ, fs=SR, output="sos")
    return signal.sosfilt(top_cut, undb(-2) * dry)


dry = scene()
out = record(dry)
wrap_up_sound(out)
```